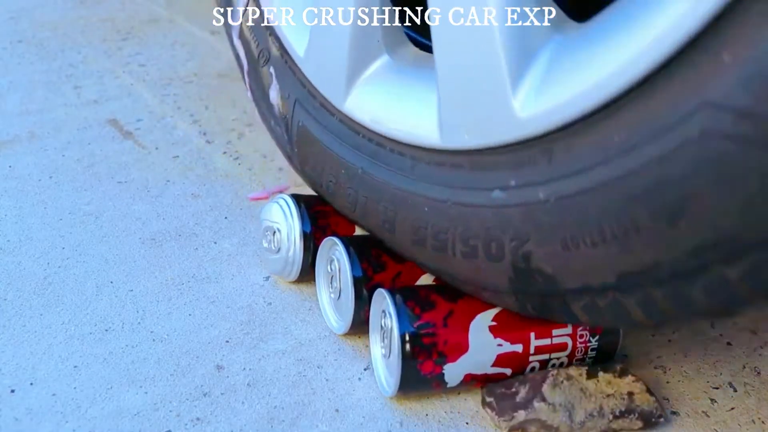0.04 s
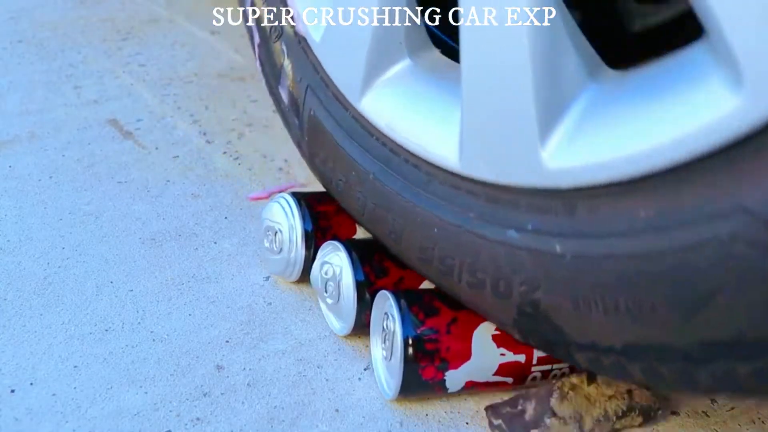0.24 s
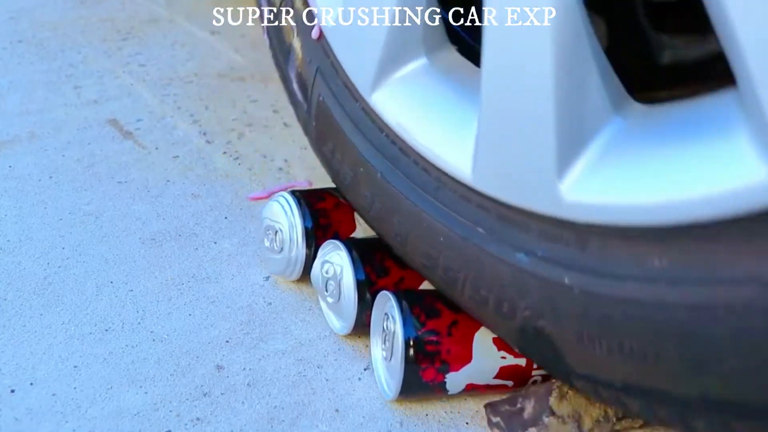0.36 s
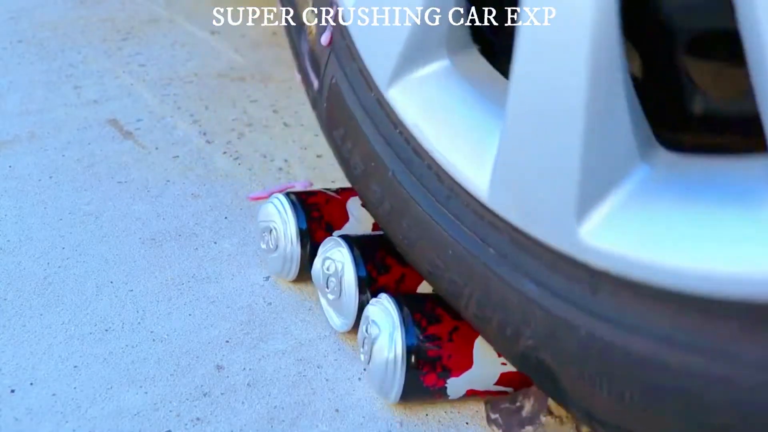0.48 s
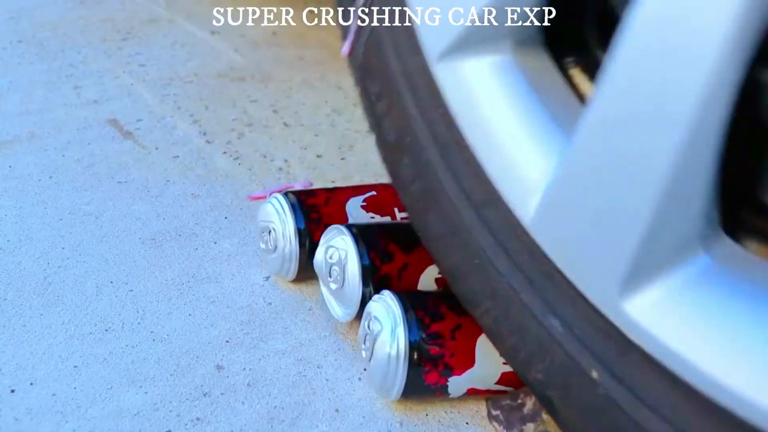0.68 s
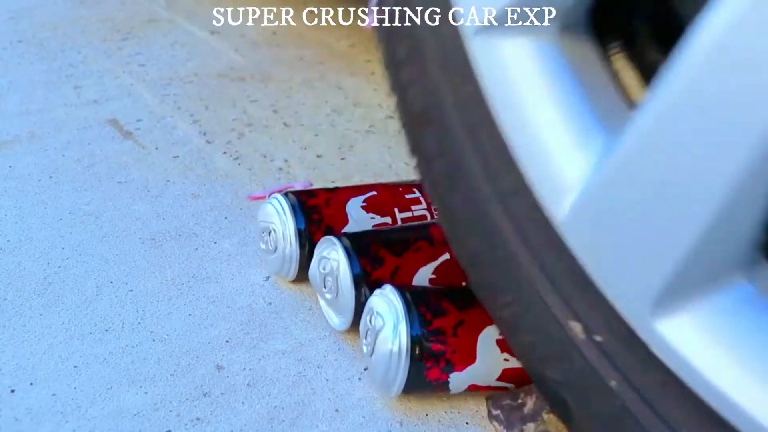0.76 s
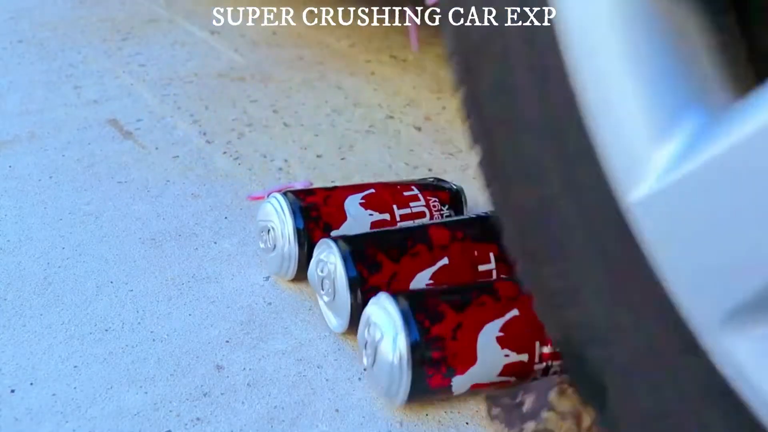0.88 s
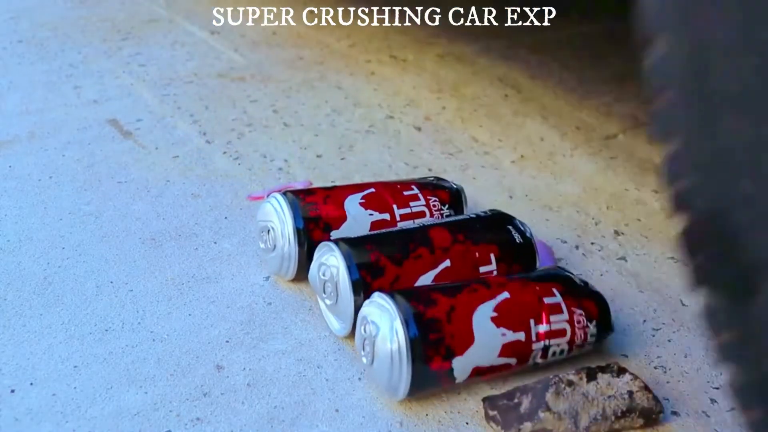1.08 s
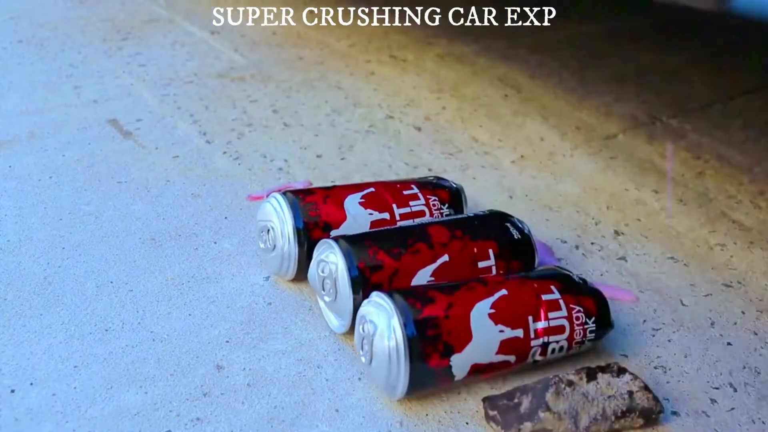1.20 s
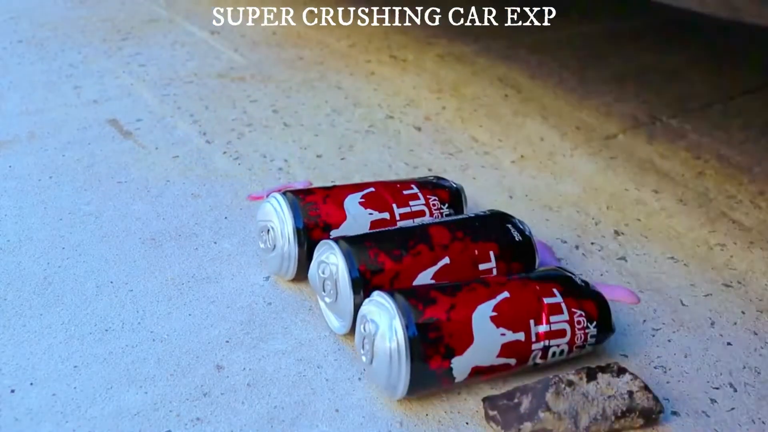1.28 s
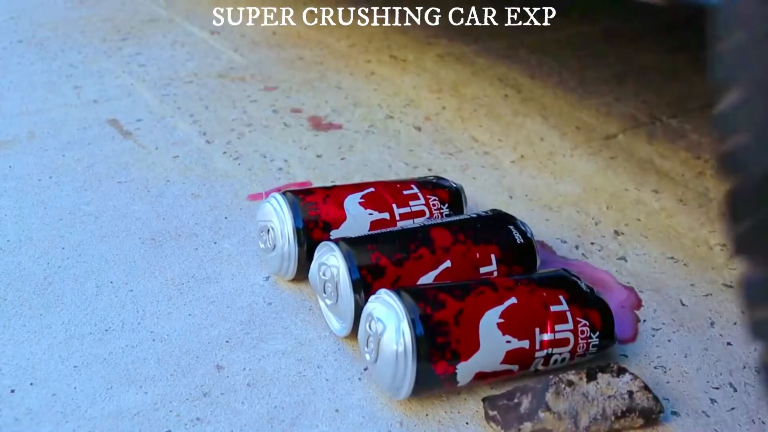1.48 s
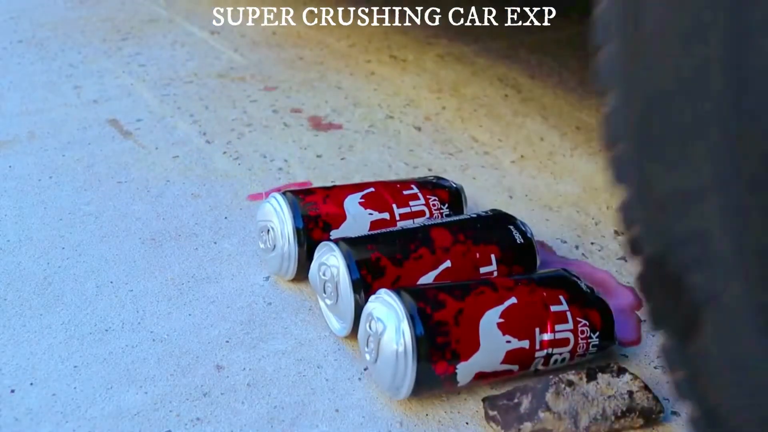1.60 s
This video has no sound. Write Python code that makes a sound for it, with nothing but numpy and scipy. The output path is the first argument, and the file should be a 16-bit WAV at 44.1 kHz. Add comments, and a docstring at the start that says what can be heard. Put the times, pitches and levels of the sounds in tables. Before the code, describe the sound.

Metal cans buckling under a rolling car tire, sharp overloaded bangs, then snaps and dents outdoors

```python
"""Outdoors, on concrete: a car tire rolls slowly over drink cans, close to the microphone.
Three can walls buckle: low push, noise burst and can modes, overloading the microphone; the tire's air rings.
Sheet metal snaps and dents (clicks through resonances) and crackles (short sine grains) between them.
A thin whistle leaks out twice (unsteady rising sine), over hush, treble hiss and a faint low rumble (noise).
"""
import sys
import numpy as np
from scipy import signal
from scipy.fft import rfft, irfft, next_fast_len
from scipy.io import wavfile
from scipy.ndimage import uniform_filter1d

SR = 44100
rng = np.random.default_rng(int(sys.argv[2]) if len(sys.argv) > 2 else 0)


def wav_out(sig):
    """Save sig, one row per channel (or a flat mono array), as 16-bit PCM at SR to the path in sys.argv[1]."""
    wavfile.write(sys.argv[1], SR, np.round(np.clip(np.atleast_2d(sig).T, -1, 1) * 32767).astype(np.int16))


N = 72765

# can walls buckling: t/s, noise level/dB, low push/dB, tire ring/dB, tire overtone/dB, can ring/dB,
# push f/Hz, decay factor, dull above f/Hz, loudest wall mode f/Hz, its level/dB
BUCKLES = [(.157, 5, 3.5, -17, -21.5, -20.5, 330, 0.47, 19400, 1240, -0.5),
           (0.2759, -18, 3.5, -26, -56.5, -35.5, 290, 1, 3230, 2735, -17.5),
           (.5334, 2, 6, -26.5, -20.5, -27.5, 430, 0.85, 20000, 1628, -3.5)]
# spectrum of the noise burst: f/Hz, level/dB
BURST_COLOUR = [(60, -29), (110, -6.5), (270, 4), (350, -11), (620, 2), (900, -6), (1400, -1), (2000, -7),
                (2800, 0), (4000, -8.5), (15000, -25.5)]
# burst decay before the decay factor: f/Hz, T60/s
BURST_DECAY = [(100, 0.055), (300, 0.046), (1000, 0.067), (3000, 0.042), (12000, 0.05)]
# air in the tire, then its overtone: f/Hz, T60/s
TIRE_MODES = [(226.5, 0.77), (441.5, 0.45)]
# a can's domed end rattling: t/s, level/dB
END_RATTLES = [(.2805, -7.5), (.2925, -13.5), (.304, -30), (.3225, -27), (.341, -29), (.376, -32)]
# can modes, nominal: f/Hz, level/dB, T60/s
CAN_MODES = [(604, 4.5, 0.027), (1250, -12, 0.066), (1500, -10.5, 0.085), (1550, -8.5, 0.25),
             (2010, -8.5, .08), (3140, -0.5, 0.046)]
# metal creasing, bright snaps to dull dents: t/s, peak before low cut/dB, f/Hz, sharpness Q,
# treble re body/dB, T60 of the exciting rattle/s
SNAPS_AND_DENTS = [(0.0411,-27.5,6700,1.6,-18,0.015),(0.0812,-29,3880,3.6,40,0.015),(0.0835,-22.5,413,1.73,-50,0.031),
                   (0.1055,-26.5,3040,1.07,5.5,0.036),(0.1282,-31.5,4850,0.69,2,0.051),(0.1468,-20.5,4460,0.57,5,0.02),(0.1619,-4.5,270,5.4,-54,0.014),(0.28,-7,3030,1.44,-53,0.018),
                   (0.326,-22.5,3340,1.3,3,0.031),(0.4341,-10,2610,1.07,1.5,0.012),(0.4462,-17,517,1.17,-37,0.0045),
                   (0.603,-26.5,280,2.3,-45,0.011),(.6035,-12.5,800,1.27,-37,0.024),(.608,-14,960,0.97,-35,0.017),(0.6196,-19,4000,1.9,-4,0.018),(0.6266,-7.5,1850,3.5,12,0.0088),
                   (0.6653,0,2560,0.56,-31,0.0081),(0.675,-20,3450,2.2,-30,0.038),(0.7315,0,2280,0.39,-9.5,0.018),(.7536,-26,2170,0.34,-38,0.022),
                   (0.7669,-12.5,2750,0.82,-20,0.012),(0.8056,-25.5,1990,0.79,-20,0.021),(.81,-34.5,343,8.3,-13,0.16),(0.85,-29,2040,0.45,-3,0.015),
                   (0.868,-30,4900,4.2,7,0.044),(0.8725,-3.5,3000,0.97,-0.5,0.013),(0.883,-9,5050,3.8,0.5,0.014),(0.9,-11.5,3000,0.94,-17,0.044),
                   (0.8998,-17.5,416,1.85,-40,0.021),(.9015,-22,855,4.3,-40,0.052),(0.9095,-15.5,730,0.51,-20,0.027),(0.92,-15,1680,0.47,-10,0.013),(0.931,-24,2540,0.75,-13,0.027),(0.9435,-12.5,1490,1.07,-14,0.0088),
                   (0.93,-27,288,3.4,-55,0.072),(0.968,-32,3380,3.4,-25,0.0034),(0.9767,-30,3340,4.7,-27,0.0054),(0.9855,-28.5,1880,0.63,-1,0.0092),
                   (1.1073,-7.5,1560,0.67,-24,0.011),(1.2059,-26,1833,0.43,0,0.022),(1.64,-24.5,1090,0.56,-3,0.007)]
# colour of crease treble and hiss: f/Hz, level/dB
TREBLE_COLOUR = [(3000,-17.5),(5400,1.5),(8700,3.5),(11000,-6.5),(13500,5),(15500,-38.5)]
# crackle: t/s, level/dB
CRACKLE_LEVEL = [(0,-55),(.2,-51),(.5,-88),(.6,-35),(.87,-42.5),(.91,-34.5),(.945,-34.5),(.96,-53),(1.1,-53),(1.3,-63.5),(1.65,-57)]
# whistle: t/s, length/s, start f/Hz, end f/Hz, level before flutter/dB
WHISTLE_TONES = [(.545, 0.095, 12900, 13570, -59.5), (0.942, .08, 13100, 13200, -73)]
# echo between car and ground, before its decay factor: f/Hz, T60/s
UNDER_CAR_DECAY = [(100, 0.96), (300, 0.28), (1000, 0.38), (4000, 0.22), (12000, 0.26)]
# outdoor hush spectrum: f/Hz, level/dB
HUSH_COLOUR = [(40,-22),(200,-6.5),(372,-8.5),(388,3),(405,-6.5),(1250,-9),(1310,-1),(1370,-8.5),(3000,-15.5),(6000,-25.5)]
# outdoor hush: t/s, level/dB
HUSH_CURVE = [(0,-60),(.8,-47.5),(1.02,-52),(1.2,-52),(1.65,-59)]
# treble hiss: t/s, level/dB
HISS_CURVE = [(0,-51.5),(.14,-54),(.3,-56),(.53,-80),(.75,-58),(.92,-62.5),(1.48,-59),(1.51,-65.5),(1.65,-67.5)]
# low rumble: t/s, level/dB
RUMBLE_CURVE = [(0,-71),(.2,-49),(.5,-57),(.6,-82),(1.08,-65.5),(1.15,-66),(1.3,-66),(1.36,-74.5),(1.49,-76.5),(1.505,-55),(1.585,-62),(1.65,-62.5)]

PUSH_T60_S, WALL_T60_S = 0.013, 0.041
PUSH_RISE = 2.1  # rise time constant = this / dulling frequency: duller bangs rise more slowly
TIRE_LEFT_DB, TIRE_LEFT_T60_S = -42.5, 0.11  # still ringing at the start
END_HZ, END_T60_S, END_DETUNE = 972, 0.054, 0.011
BANG_LOW_CUT_HZ, CREASE_LOW_CUT_HZ = 53, 180
CLICK_DB = 11.5
HOLLOW_HZ, HOLLOW_DB, HOLLOW_T60_S = 395, -17, 0.012  # the can's hollow body, re crease body peak
CRACKLE_RATE_PER_S, CRACKLE_HZ, CRACKLE_SPREAD_OCT = 1750, 2270, 0.856
CRACKLE_DECAY_CYCLES, CRACKLE_SPREAD_DB = 2.6, 4.5
FLUTTER_DB, WANDER_HZ = 5.5, 60  # whistle, rms
RUMBLE_HZ = 43
ECHO_DB = -16
CEILING, CLIP_HARDNESS, TOP_HZ = 0.95, 11, 16000


def amp(db):
    """dB to gain."""
    return 10 ** (np.asarray(db) / 20)


def unit(x):
    """Scale to rms 1."""
    return x / np.sqrt(np.mean(x ** 2) + 1e-20)


def along(points, hz):
    """Interpolate (f/Hz, value) points on a log frequency axis."""
    f, v = np.transpose(points)
    return np.interp(np.log(hz + 1), np.log(f + 1), v)


def curve(rows):
    """Interpolate (t/s, value) rows to one value per sample."""
    return np.interp(np.arange(N) / SR, *np.transpose(rows))


def filtered(x, response):
    """Multiply the spectrum by a complex response of frequency."""
    m = next_fast_len(len(x) + 8192)
    spectrum = rfft(x, m) * response(np.fft.rfftfreq(m, 1 / SR))
    return irfft(spectrum, m)[:len(x)]


def low_cut(x, hz):
    """Two cascaded one-pole high-passes."""
    return filtered(x, lambda f: (1j * f / (hz + 1j * f)) ** 2)


def resonance(hz, q):
    """Response of a causal second-order band-pass."""
    return lambda f: 1j * f * hz / q / (hz * hz - f * f + 1j * f * hz / q)


def coloured_noise(colour):
    """White noise shaped to a (f/Hz, level/dB) colour, rms 1."""
    return unit(filtered(rng.standard_normal(N), lambda f: amp(along(colour, f))))


def ring(hz, t60_s, t):
    """Exponentially dying sine."""
    return np.sin(2 * np.pi * hz * t) * amp(-60 * t / t60_s)


def rise(t, tau_s):
    """Exponential onset towards 1."""
    return 1 - np.exp(-t / tau_s)


def add(track, s, x):
    """Mix x into track at time s."""
    i = round(s * SR)
    track[i:i + len(x)] += x[:N - i]


def dying_noise(decay, stretch):
    """Half a second of noise, each frequency dying at its own T60 times stretch."""
    hz, t, z = signal.stft(rng.standard_normal(SR // 2), SR, nperseg=128)
    t60_s = stretch * along(decay, hz)[:, None]
    return signal.istft(z * amp(-60 * t / t60_s), SR, nperseg=128)[1]


def noise_burst(stretch, dull_hz):
    """Coloured dying noise, dulled by two one-pole low-passes; rms 1 over its first 200 samples."""
    def colour(f):
        return amp(along(BURST_COLOUR, f)) / (1 + 1j * f / dull_hz) ** 2

    x = filtered(dying_noise(BURST_DECAY, stretch), colour)
    return x / np.sqrt(np.mean(x[:200] ** 2))


def can_ring(t):
    """Sum of the can's modes, each level redrawn with a 2 dB spread."""
    return sum(amp(db + rng.normal(0, 2)) * ring(hz, t60_s, t) for hz, db, t60_s in CAN_MODES)


def bangs():
    """Buckling walls push, burst and ring the can; tire air and a can end ring on. Returns both tracks."""
    bang, ringing, t = np.zeros(N), np.zeros(N), np.arange(N) / SR
    add(ringing, 0, amp(TIRE_LEFT_DB) * ring(TIRE_MODES[0][0], TIRE_LEFT_T60_S, t))
    for (s, db, push_db, tire_db, over_db, can_db,
         push_hz, stretch, dull_hz, wall_hz, wall_db) in BUCKLES:
        push = ring(push_hz, PUSH_T60_S, t) * rise(t, PUSH_RISE / dull_hz)
        wall = amp(wall_db) * ring(wall_hz, WALL_T60_S, t)
        add(bang, s, -amp(push_db) * push)
        add(bang, s + 0.00079, amp(db) * noise_burst(stretch, dull_hz))
        add(bang, s + 0.0012, amp(can_db) * can_ring(t) + wall)
        for (hz, t60_s), level_db in zip(TIRE_MODES, (tire_db, over_db)):
            add(ringing, s, amp(level_db) * ring(hz, t60_s, t) * rise(t, 0.0033))
    for s, db in END_RATTLES:
        hz = END_HZ * (1 + rng.normal(0, END_DETUNE))
        add(ringing, s, amp(db) * ring(hz, END_T60_S, t) * rise(t, 0.0018))
    return low_cut(bang, BANG_LOW_CUT_HZ), ringing


def crease(hz, q, treble_db, t60_s):
    """A click and short rattle excite a resonance, the treble and the hollow body; peak 1."""
    t = np.arange(SR // 10) / SR
    kick = rng.standard_normal(len(t)) * amp(-60 * t / max(t60_s, 0.002))
    kick[0] = -amp(CLICK_DB)
    body = filtered(kick, lambda f: resonance(hz, max(q, 0.3))(f) ** 2)
    treble = filtered(kick, lambda f: amp(along(TREBLE_COLOUR, f)))
    x = body / abs(body).max() + amp(treble_db) * treble / abs(treble).max()
    x -= amp(HOLLOW_DB) * ring(HOLLOW_HZ, HOLLOW_T60_S, t)
    return x / abs(x).max()


def creases():
    """Single snaps and dents of sheet metal, each a struck resonance."""
    out = np.zeros(N)
    for s, db, *kind in SNAPS_AND_DENTS:
        add(out, s, amp(db) * crease(*kind))
    return low_cut(out, CREASE_LOW_CUT_HZ)


def crackle():
    """Tiny creases and grit under the tread: dying sine grains at random times, pitches and levels."""
    count = 3000
    gaps_s = -np.log(1 - rng.random(count)) / CRACKLE_RATE_PER_S
    start = (np.cumsum(gaps_s) * SR).astype(int)
    level_db = CRACKLE_SPREAD_DB * np.minimum(rng.exponential(size=count), 3)
    octaves = CRACKLE_SPREAD_OCT * rng.standard_normal(count)
    hz = np.clip(CRACKLE_HZ * 2 ** octaves, 200, 6000)[:, None]
    k = np.arange(400)
    cycles = hz * k / SR
    grains = amp(level_db)[:, None] * np.sin(2 * np.pi * cycles) * np.exp(-cycles / CRACKLE_DECAY_CYCLES)
    x = np.bincount((start[:, None] + k).ravel(), grains.ravel(), N)[:N]
    return unit(x) * amp(curve(CRACKLE_LEVEL))


def whistle():
    """Thin rising sine, unsteady in pitch and level, perhaps gas leaking from a split can."""
    out = np.zeros(N)
    for s, length_s, from_hz, to_hz, db in WHISTLE_TONES:
        n = round(length_s * SR)
        wander = unit(uniform_filter1d(rng.standard_normal(n), size=60))
        flutter = unit(uniform_filter1d(rng.standard_normal(n), size=250))
        hz = np.linspace(from_hz, to_hz, n) + WANDER_HZ * wander
        tone = np.sin(2 * np.pi * np.cumsum(hz) / SR)
        add(out, s, amp(db + FLUTTER_DB * flutter) * np.sqrt(np.hanning(n)) * tone)
    return out


def echo(x):
    """Sound trapped between car floor and concrete: delay, then convolution with dying noise."""
    tail = dying_noise(UNDER_CAR_DECAY, 0.77)
    delayed = np.pad(x, (150, 0))  # samples
    return signal.fftconvolve(delayed, tail / np.linalg.norm(tail))[:N]


def background():
    """Outdoor hush, treble hiss and low rumble: filtered noises under level curves."""
    hush = coloured_noise(HUSH_COLOUR) * amp(curve(HUSH_CURVE))
    hiss = coloured_noise(TREBLE_COLOUR) * amp(curve(HISS_CURVE))
    rumble = unit(filtered(rng.standard_normal(N), lambda f: resonance(RUMBLE_HZ, 0.6)(f) ** 2))
    return hush + hiss + rumble * amp(curve(RUMBLE_CURVE))


def scene():
    """Sum of all sources; only bangs and creases feed the echo."""
    bang, ringing = bangs()
    metal = bang + creases()
    near = metal + amp(ECHO_DB) * echo(metal) + ringing
    return (near + crackle() + whistle() + background())[None]


def record(dry):
    """The microphone saturates just under full scale, then a steep low-pass limits its band."""
    x = dry[0]
    clipped = CEILING * x / (1 + abs(x) ** CLIP_HARDNESS) ** (1 / CLIP_HARDNESS)
    return filtered(clipped, lambda f: 1 / (1 + (f / TOP_HZ) ** 80))[None]


dry = scene()
out = record(dry)
wav_out(out)
```